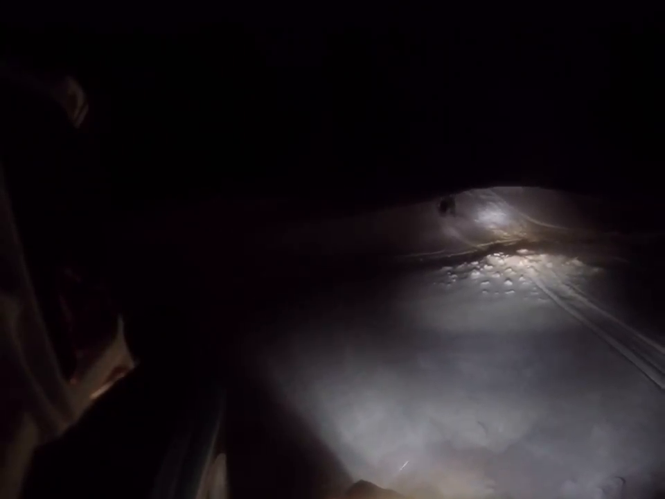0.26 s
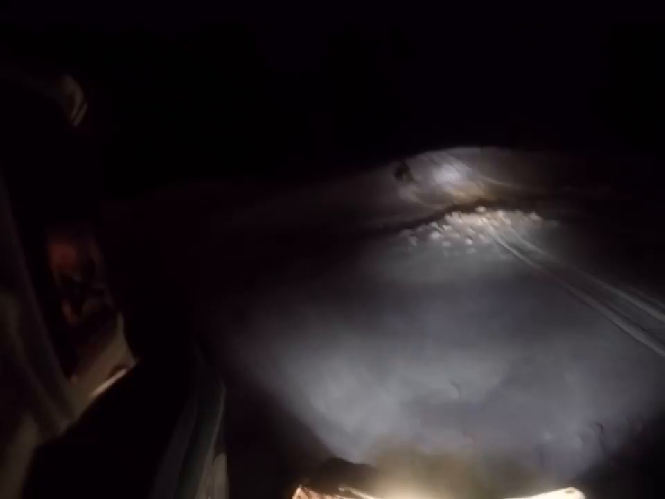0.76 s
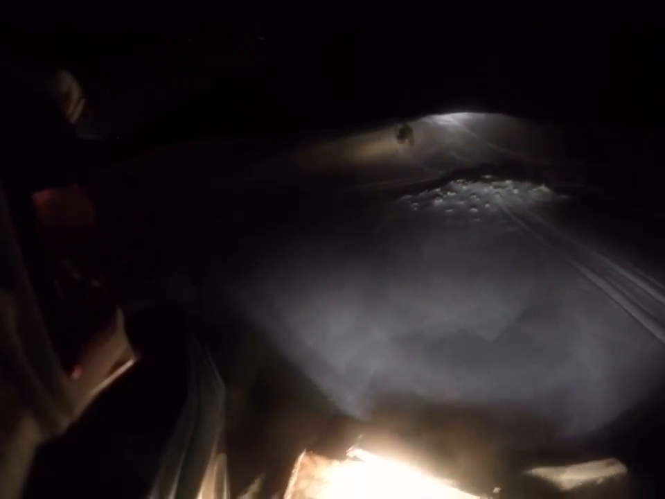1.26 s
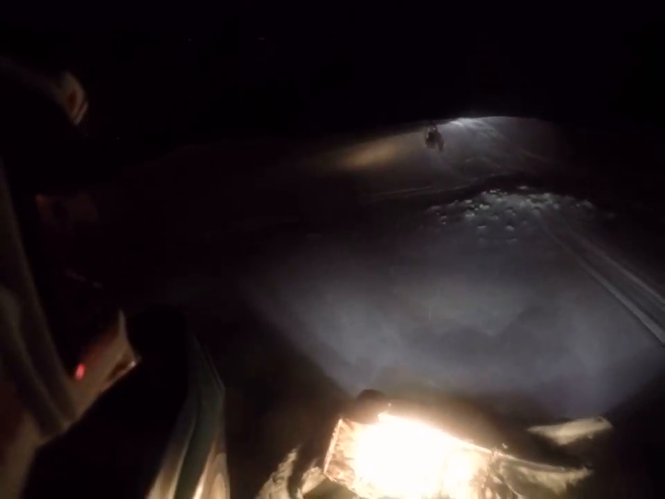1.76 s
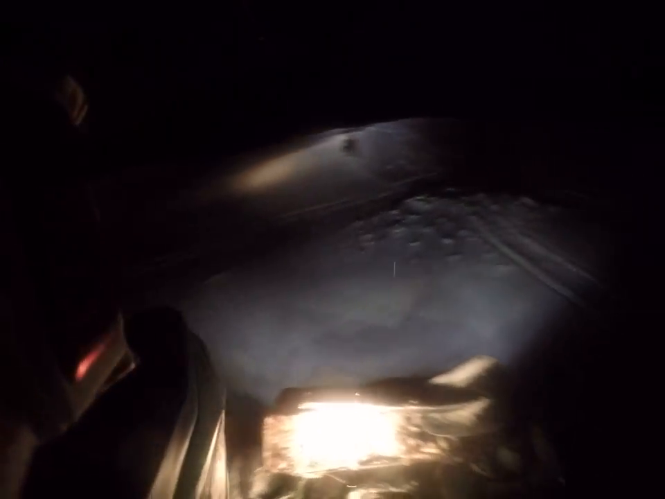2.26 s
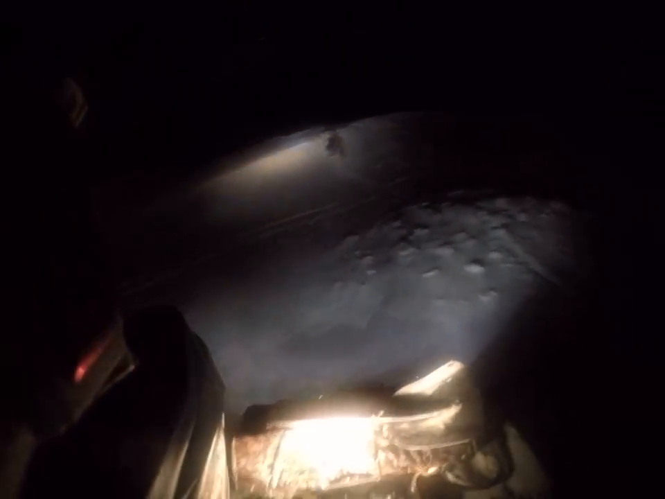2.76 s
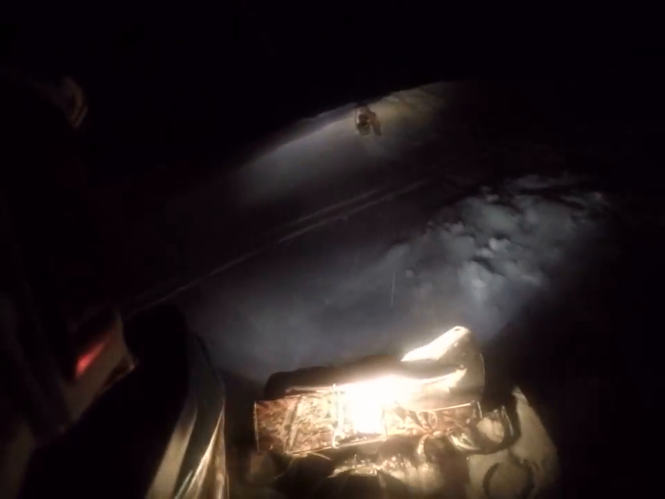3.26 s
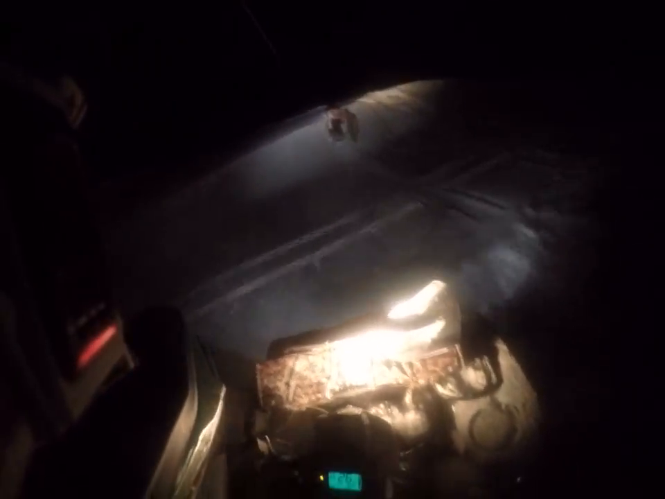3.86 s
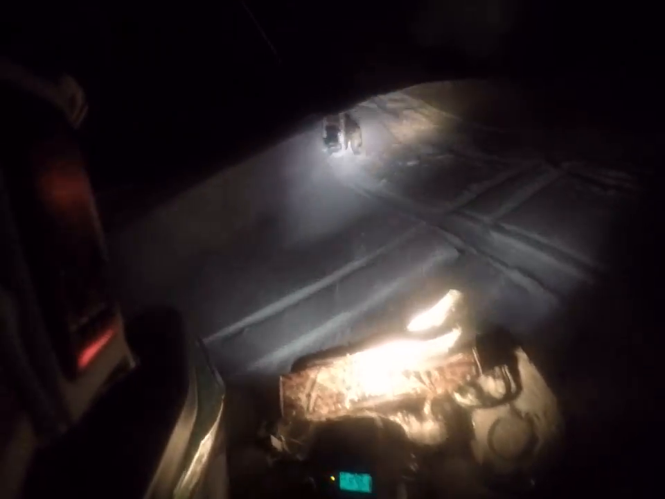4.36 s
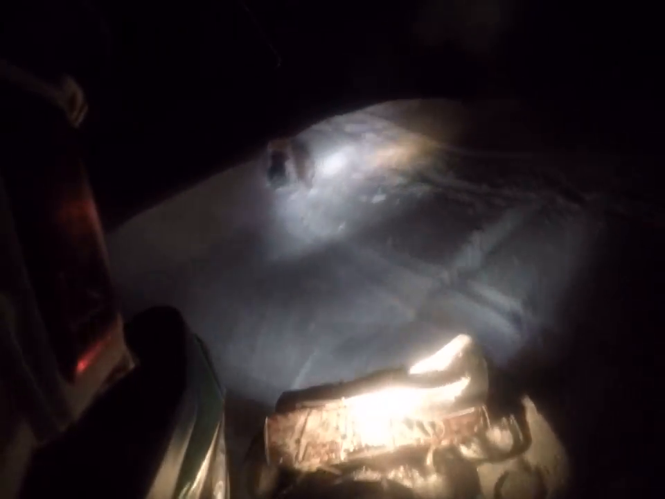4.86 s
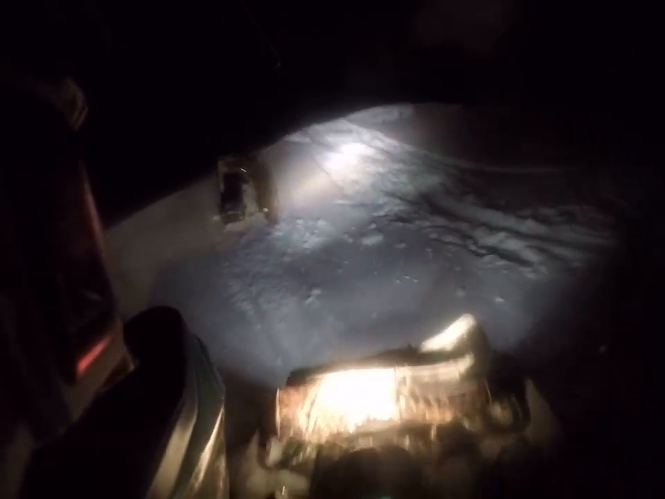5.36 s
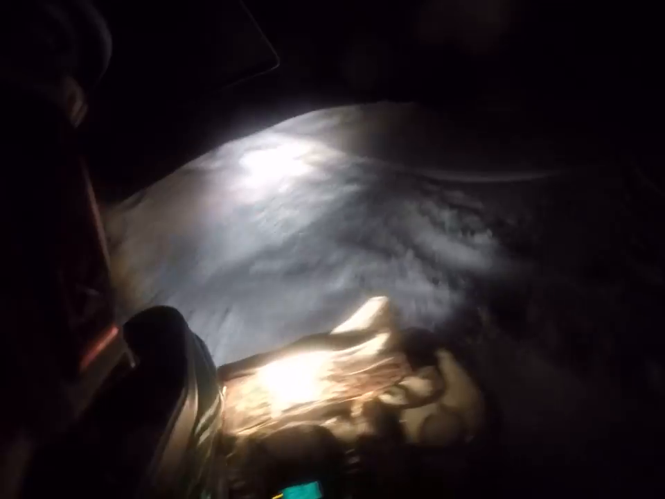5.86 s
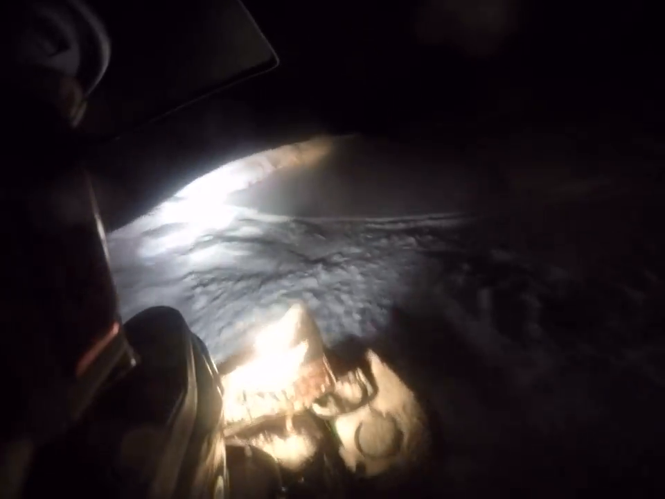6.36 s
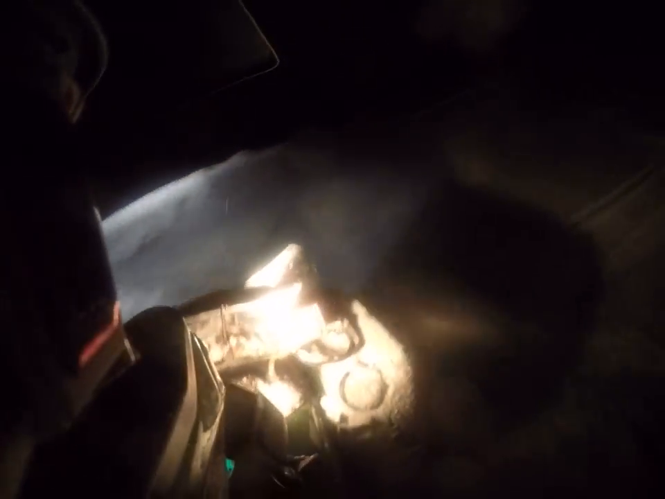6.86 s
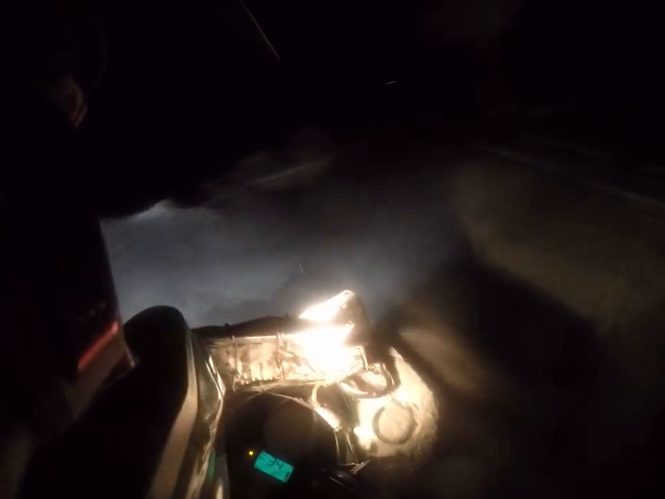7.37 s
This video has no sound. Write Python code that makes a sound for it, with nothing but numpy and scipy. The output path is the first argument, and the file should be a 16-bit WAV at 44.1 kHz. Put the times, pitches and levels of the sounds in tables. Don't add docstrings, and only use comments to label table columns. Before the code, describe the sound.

Heard from a hard case on the rider: low putting idle, a quick rev, a dip, and a second rise that holds with small easings. The exhaust turns fuller and rougher, with metallic clatter and hissing snow. Cloth rubs, ice grains tick, loose gear taps, and sharp knocks strike the case, the hardest with a deep thump. Faint belt chirps come late.

```python
import sys
import numpy as np
from scipy import signal
from scipy.fft import rfft, irfft
from scipy.io import wavfile
from scipy.ndimage import uniform_filter1d

SR = 44100
rng = np.random.default_rng(int(sys.argv[2]) if len(sys.argv) > 2 else 0)


def waveform_to_disk(signal):
    frames = np.transpose(np.atleast_2d(signal))
    scaled = np.clip(frames, -1, 1) * 32767
    samples = np.round(scaled).astype(np.int16)
    wavfile.write(sys.argv[1], SR, samples)


def voltage_ratio(level):
    return 10 ** (np.asarray(level, float) / 20)


N = 336042
T = np.arange(N) / SR

# time in seconds, rate in Hz.
SPEED = [(.5, 14.6), (1.08, 30.3), (1.27, 29.8), (1.45, 21), (1.92, 30.5), (2.87, 32), (3.38, 45.7),
         (3.65, 42.5), (4.08, 45.5), (4.24, 42.7), (4.6, 41.2), (5.1, 51.2), (5.5, 47.8), (6.15, 45.1),
         (6.42, 45.8), (6.8, 43.7), (7.25, 47.7), (7.62, 46.4)]
FLYWHEEL_S, IDLE_HZ, CLUTCH_HZ = 0.13, 14, 33
# time in seconds, exhaust level in dB, track load in dB, snow depth in dB.
EFFORT = [(.36, -47, -0.5, -1), (.78, -40.5, -1.5, -4.5), (.95, -33.5, -0.5, 0), (1.2, -36, -0.5, -3),
          (1.45, -38.5, 3, -2.5), (1.8, -33, 2, 1.5), (2.35, -38, -1.5, 0.5), (2.68, -36.5, -5, -4),
          (3.25, -29, -1, -1), (3.5, -33.5, -1, -2), (4.05, -29.5, 2, 1.5), (4.22, -32, 3, 1),
          (4.52, -32.5, 0.5, 0), (4.68, -29, 3, -2), (5.1, -26.5, -1, -3), (5.9, -32, -1.5, 1),
          (6.25, -29, 2, 2), (7.62, -30, 0, 0.5)]
# time in seconds, lag in ms, share 0 to 1.
INTAKE = [(0, 8, .3), (1.0, 8.3, .65), (1.9, 10.7, .7), (2.6, 10.6, .6), (2.74, 10.5, 0), (2.76, 4.6, 0),
          (3.0, 4.5, .5), (4.3, 4, .7), (7.62, 4, .7)]
# centre in Hz, width in Hz, level in dB.
PIPE_MODES = [(64, 31, -5), (95, 64.4, 2.5), (144.6, 68.3, -0.5), (186.6, 52, -3), (307.7, 47.3, -3.5),
              (337, 97, -10)]
# centre in Hz, width in Hz, level in dB.
TAILPIPE_MODES = [(436, 32, 2), (560, 130, -2.5), (643, 152, -5), (780.4, 35, 0)]
# centre in Hz, width in Hz, level in dB.
SILENCER_MODES = [(987, 39, 1), (1205, 93, -5.5)]
# frequency in Hz, density in dB per Hz.
ROAR_SPECTRUM = [(29, -25), (50, -39), (96, -20.5), (261, -3.5), (435, -8.5), (667, -7), (768, -1),
                 (886, -4.5), (1500, -15), (1950, -61), (3300, -120)]
# firing rate in Hz, level in dB.
POP_LAW = [(21, -64), (28, -57.5), (36, -47), (50, -44.5)]
# firing rate in Hz, level in dB.
SILENCER_LAW = [(15, -80), (28, -49), (33, -48.5), (41, -46), (50, -44)]
# time in seconds, half length in seconds, level in dB.
SHADED = [(1.1, 0.13, -14), (2.8, .2, -8), (4.61, .12, -4), (6.25, 0.33, -3.5)]
# time in seconds, half length in seconds, level in dB.
LIFTS = [(3.52, .1, -9), (4.36, .23, -12)]
EXHAUST_IDLE_DB, EXHAUST_DB_PER_HZ = -41.5, 0.25
BITE_DB_PER_DB, POP_BITE_DB_PER_DB, BITE_HZ, BITE_WIDTH_HZ = 2.5, 0.8, 154, 110
GROUND_LAG_MS, GROUND_DRIFT_MS, GROUND_SHARE = 2.4, 0.5, 0.6
# centre in Hz, width in Hz, level in dB.
CASE_MODES = [(1470, 158, -3.5), (1728, 143, 1.5), (1900, 146, 4.5), (2160, 281, -1.5), (2850, 97, -20),
              (5280, 220, -18.5), (7740, 210, -28.5)]
CLATTER_IDLE_DB, CLATTER_DB_PER_HZ = -49, 0.5

GEAR_TEETH = 40
# centre in Hz, width in Hz, level in dB.
GEARBOX_MODES = [(1424, 60, -47), (1667, 130, -40), (1828, 63, -38.5), (1898, 34, -34.5)]
# time in seconds, half length in seconds, level in dB.
GEAR_SLACK = (3.84, 0.36, -10)
# time in seconds, pitch in Hz, level in dB.
TRACK_HUM = [(4.55, 1470, -77), (4.75, 1462, -43), (5.3, 1371, -47), (5.8, 1448, -43.5), (6.15, 1386, -48),
             (6.5, 1304, -46), (6.7, 1240, -54), (7.15, 1286, -54), (7.62, 1310, -77)]
# time in seconds, half length in seconds, pitch in Hz, level in dB.
BELT_CHIRPS = [(5.37, 0.12, 5600, -48.5), (5.75, .22, 5610, -51), (6.433, 0.11, 5370, -53),
               (6.847, 0.14, 4600, -50.5), (7.3, .2, 5200, -53)]
# centre in Hz, width in Hz, level in dB.
PANEL_MODES = [(1200, 150, -6.5), (2785, 36, 2), (3960, 110, -9), (5410, 46, -9), (5980, 160, -15),
               (7600, 280, -22), (9700, 390, -26)]
BUZZ_DB, BUZZ_DROPS_S, BUZZ_FADE_DB = -53.5, 0.41, -7
BUZZ_SWELL_S, BUZZ_SWELL_HALF_S, BUZZ_SWELL_DB = 0.89, 0.19, -72

# time in seconds, swing level in dB.
BUMPS = [(.08, -34), (.79, -37), (.89, -37), (1.0, -29), (1.22, -31), (1.43, -30), (1.66, -30.5),
         (1.9, -37), (2.14, -39), (2.27, -45), (2.6, -31), (3.009, -16.5), (3.4, -30.5), (3.54, -30.5),
         (3.98, -31.5), (4.23, -24), (4.4, -30), (4.71, -26.5), (5.15, -30), (5.4, -33), (5.7, -43),
         (5.91, -39), (6.08, -36), (6.19, -35), (6.45, -28), (6.65, -31), (6.86, -31), (7.08, -31),
         (7.27, -33.5), (7.55, -34)]
BUMP_RISE_S, BUMP_FALL_S, SWAY_DB, LOCKED_DB = 0.052, 0.084, -41, -32.5
# frequency in Hz, density in dB per Hz.
SNOW_SPECTRUM = [(1350, -49), (2300, -7.5), (2430, -1.5), (2920, 3), (4050, -10), (4610, -7), (4990, -16),
                 (5450, -15.5), (6240, -11), (7030, -28.5), (7860, -15), (9010, -25.5), (12400, -29.5),
                 (14400, -35), (15500, -37)]
SNOW_IDLE_DB, SNOW_DB_PER_HZ = -57.5, 0.5381

# time in seconds, peak in dB, centre in Hz, case ring in dB, bright crack in dB.
KNOCKS = [(1.8886, -4, 5030, -42, -11), (3.4274, -18.5, 4500, -31, -25), (4.16, -21, 3500, -33, -20),
          (5.4392, -24, 3330, -40, -30), (2.4453, -8, 1900, -23, -34), (2.4476, 3, 2650, -7, -10),
          (2.4542, -7.5, 4400, -15.5, -31)]
# frequency in Hz, level in dB, t60 in seconds.
KNOCK_MODES = [(842, -5, 0.042), (1494, -4.5, 0.042), (1743, -12.5, 0.11), (2100, -13, 0.061),
               (2895, -0.5, 0.016), (3045, -21, 0.073), (3830, -14, 0.015), (4420, -32, 0.011),
               (5740, 2, 0.0052)]
# time in seconds, frequency in Hz, level in dB, t60 in seconds.
THUMP = (2.4462, 39, -10, .55)
RING_CYCLES = 27.8
# time in seconds, peak in dB, ring in Hz.
RATTLES = [(0.657, -45, 1920), (0.88, -37, 1860), (0.9171, -30, 1870), (2.482, -32, 1680),
           (2.492, -37, 1600), (4.2941, -26, 1670), (5.648, -24, 1830), (6.9035, -20, 1810)]
# time in seconds, peak in dB, mid band relative in dB.
TICKS = [(1.4383, -35, -10), (1.747, -39, 6), (1.9704, -36, 5), (2.3022, -34, 3), (3.0054, -36, 2),
         (3.0098, -29.5, 2), (3.083, -34, -12), (3.3795, -31, -10), (3.4272, -37, 7), (3.459, -35, -8),
         (3.5084, -41, 9), (3.8876, -39, -4), (3.9749, -38, -3), (4.0582, -31, -6), (4.16, -23.5, -1),
         (4.5894, -38, -17), (4.8249, -38, -1), (4.8618, -35, 8), (5.0486, -37.5, 18), (5.1352, -39, -4),
         (5.3423, -37, 1), (5.697, -29.5, 8), (5.903, -37, -4), (6.2492, -32, -10), (6.324, -38, -4),
         (6.9743, -33, -1), (6.9892, -30, 11), (7.0394, -32, -9), (7.1777, -32, -3), (7.2903, -39, -4)]
# time in seconds, half length in seconds, level in dB, bright band relative in dB.
RUBS = [(.94, 0.036, -50, -26), (1.423, 0.058, -44, -19), (1.503, 0.038, -37.5, -25),
        (1.612, 0.053, -40.5, -23), (2.2, 0.14, -45.5, -21), (4.06, 0.15, -41.5, -18),
        (4.322, 0.059, -47.5, -12), (4.889, 0.033, -39, -15), (4.974, 0.056, -39, -18)]
HISS_DB = -68.5


def level(x, db=0):
    return x * voltage_ratio(db) / np.sqrt(np.mean(x ** 2))


def ring(x, hz, width_hz):
    return signal.lfilter(*signal.iirpeak(hz, hz / width_hz, fs=SR), x)


def ring_twice(x, first, second):
    return ring(ring(x, *first), *second)


def body(x, modes):
    return sum((-1) ** k * voltage_ratio(db) * ring(x, hz, width_hz) for k, (hz, width_hz, db) in enumerate(modes))


def steep(x, hz, kind):
    return signal.sosfilt(signal.butter(4, hz, kind, fs=SR, output="sos"), x)


def coloured(spectrum):
    hz, db = np.transpose(spectrum)
    f = np.maximum(np.fft.rfftfreq(N, 1 / SR), 1)
    shape = voltage_ratio(np.interp(np.log(f), np.log(hz), db, -90, -90))
    return level(irfft(rfft(rng.standard_normal(N)) * shape, N))


def walk(rate_hz):
    hold = int(SR / rate_hz)
    steps = rng.standard_normal(N)[np.arange(N) // hold]
    return level(uniform_filter1d(uniform_filter1d(steps, hold), hold))


def swell(s, half_s):
    return np.exp(-((T - s) / half_s) ** 2)


def curves(table):
    s, *columns = np.transpose(table)
    return [np.interp(T, s, c) for c in columns]


def add(out, s, sound):
    i = int(s * SR)
    out[i:i + len(sound)] += sound[:len(out) - i]


def decay(t, t60_s):
    return voltage_ratio(-60 * t / t60_s)


def sine(hz, t):
    return np.sin(2 * np.pi * hz * t)


def revs():
    return uniform_filter1d(curves(SPEED)[0], int(FLYWHEEL_S * SR))


def engine():
    hz = revs()
    turns = np.cumsum(hz) / SR
    pipe_db = curves(EFFORT)[0]
    push_db = pipe_db - EXHAUST_IDLE_DB - EXHAUST_DB_PER_HZ * (hz - IDLE_HZ)
    direct, with_return = firings(turns, jitter=0.002, scatter_db=1.2) / np.sqrt(hz)
    spread = scatter(direct, [2.3, 4.1], gain=0.55)
    return (voltage_ratio(pipe_db) * exhaust(with_return, hz, turns, push_db)
            + ground(pops(spread, hz, push_db)) + clatter(spread, hz, turns))


def firings(turns, jitter, scatter_db):
    cycle = np.arange(1, int(turns[-1]))
    late, strength = rng.standard_normal((400, 2))[:len(cycle)].T
    at = np.interp(cycle + jitter * late, turns, np.arange(N))
    i = at.astype(int)
    size = voltage_ratio(scatter_db * strength)
    pulses = np.zeros(N + 1)
    pulses[i] += size * (1 - (at - i))
    pulses[i + 1] += size * (at - i)
    lag_ms, share = curves(INTAKE)
    back = np.zeros(N + SR)
    back[i + (lag_ms[i] * SR / 1000).astype(int)] = size * np.clip(share[i], 0, 1)
    return pulses[:N], pulses[:N] - back[:N]


def scatter(x, lags_ms, gain):
    for lag in (np.array(lags_ms) * SR / 1000).astype(int):
        taps = np.r_[1, np.zeros(lag - 1), -gain]
        x = signal.lfilter(taps[::-1], taps, x)
    return x


def exhaust(pulses, hz, turns, push_db):
    slack = np.clip((24 - hz) / 8, 0, 1)
    pipe = level(steep(body(scatter(pulses, [3.2], gain=0.33), PIPE_MODES), 356, "low"), -1.98)
    pipe = pipe * voltage_ratio(-5 * slack)
    lift_db = sum(db * swell(s, half_s) for s, half_s, db in LIFTS)
    bite_db = np.clip(BITE_DB_PER_DB * push_db, -10, 0.3) + lift_db - 5 * slack
    bite = (voltage_ratio(bite_db) - 1) * ring(pipe, BITE_HZ, BITE_WIDTH_HZ)
    gas = voltage_ratio(2.2 * walk(25)) * coloured(ROAR_SPECTRUM)
    roar = level(gas, -17) + slack * level(steep(gas, 150, "low"), -5)
    crank = voltage_ratio(2) * np.exp(-((hz - 31) / 9) ** 2) * sine(2, turns) + voltage_ratio(-7) * sine(1, turns)
    return pipe + bite + roar + crank


def pops(spread, hz, push_db):
    throttle_db = POP_BITE_DB_PER_DB * np.clip(push_db, -2, 4) * (hz < CLUTCH_HZ)
    tailpipe_db = np.interp(hz, *np.transpose(POP_LAW)) + throttle_db
    shade_db = sum(db * swell(s, half_s) for s, half_s, db in SHADED)
    silencer_db = np.interp(hz, *np.transpose(SILENCER_LAW)) + shade_db
    tailpipe = level(steep(body(spread, TAILPIPE_MODES), 390, "high"), 0)
    silencer = level(steep(body(spread, SILENCER_MODES), 850, "high"), -1)
    return voltage_ratio(tailpipe_db) * tailpipe + voltage_ratio(silencer_db) * silencer


def ground(x):
    lag_s = (GROUND_LAG_MS + GROUND_DRIFT_MS * walk(1.507)) / 1000
    return (x + GROUND_SHARE * np.interp(T - lag_s, T, x)) / np.hypot(1, GROUND_SHARE)


def clatter(spread, hz, turns):
    valves = 3.0 + 0.23 * np.exp(-(turns % 1) / 0.15) + 0.5 * np.exp(-((turns + 0.26) % 1) / 0.44)
    strikes = valves * voltage_ratio(0.51 * walk(120) + 0.5 * walk(16)) * rng.standard_normal(N)
    strikes = strikes + 12 * spread * np.sqrt(SR / 40)
    db = CLATTER_IDLE_DB + CLATTER_DB_PER_HZ * (hz - IDLE_HZ) + curves(EFFORT)[1]
    return voltage_ratio(db) * level(steep(body(strikes, CASE_MODES), 1180, "high"), -1.72)


def drive():
    return gear_whine() + squeal(*curves(TRACK_HUM), blur_hz=45) + belt() + panel_buzz()


def gear_whine():
    hz = revs()
    slack_s, slack_half_s, slack_db = GEAR_SLACK
    engaged = np.clip((hz - CLUTCH_HZ) / 2, 0, 1) * voltage_ratio(slack_db * swell(slack_s, slack_half_s))
    teeth = tone(GEAR_TEETH * hz, 0.5 * curves(EFFORT)[1], wobble_hz=6, flicker_db=3)
    return engaged * body(teeth, GEARBOX_MODES)


def tone(hz, db, wobble_hz, flicker_db):
    phase = 2 * np.pi * np.cumsum(hz + wobble_hz * walk(60)) / SR
    return np.sqrt(2) * voltage_ratio(db + flicker_db * walk(18)) * np.sin(phase)


def squeal(hz, db, blur_hz):
    phase = 2 * np.pi * np.cumsum(hz) / SR
    return voltage_ratio(db) * (walk(blur_hz) * np.sin(phase) + walk(blur_hz) * np.cos(phase))


def belt():
    slip = sum(voltage_ratio(db) * swell(s, half_s) for s, half_s, _, db in BELT_CHIRPS)
    s, _, hz, _ = np.transpose(BELT_CHIRPS)
    return slip * squeal(np.interp(T, s, hz), 0, blur_hz=450)


def panel_buzz():
    buzz = level(body(voltage_ratio(2.0 * walk(70)) * rng.standard_normal(N), PANEL_MODES))
    fade_db = BUZZ_FADE_DB * np.clip((T - BUZZ_DROPS_S) / 0.11 + 0.5, 0, 1)
    idle = voltage_ratio(BUZZ_DB + fade_db) * (T < BUZZ_SWELL_S + 2 * BUZZ_SWELL_HALF_S)
    extra = voltage_ratio(BUZZ_SWELL_DB) * swell(BUZZ_SWELL_S, BUZZ_SWELL_HALF_S)
    return (idle + extra) * buzz


def mount():
    hz = revs()
    locked = np.exp(-((hz - 31.5) / 5) ** 2)
    sway_hz = locked * hz + (1 - locked) * (36 + 5.524 * walk(9))
    sway = np.sqrt(2) * np.sin(2 * np.pi * np.cumsum(sway_hz) / SR)
    jolts = level(ring_twice(rng.standard_normal(N), (30, 45), (38, 60)), -4)
    swing = voltage_ratio(SWAY_DB) + voltage_ratio(LOCKED_DB) * locked
    for s, db in BUMPS:
        swing = swing + voltage_ratio(db) * swell(s, np.where(T < s, BUMP_RISE_S, BUMP_FALL_S))
    held = 1 - swell(THUMP[0] + 0.06, 0.08)
    return steep(voltage_ratio(-1.5) * swing * held * (sway + jolts), 62, "low")


def snow():
    grains = voltage_ratio(0.87 * walk(150) + 0.83 * walk(20)) * coloured(SNOW_SPECTRUM)
    db = SNOW_IDLE_DB + SNOW_DB_PER_HZ * (revs() - IDLE_HZ) + curves(EFFORT)[2]
    return voltage_ratio(db) * level(grains, -0.9)


def knocks():
    out, t = np.zeros(N), T[:SR // 2]
    modes = sum(voltage_ratio(db) * sine(hz, t) * decay(t, t60_s) for hz, db, t60_s in KNOCK_MODES)
    noises = rng.standard_normal((len(KNOCKS), len(t)))
    for (s, db, hz, case_db, crack_db), noise in zip(KNOCKS, noises):
        own = 1.14 * sine(hz, t) + ring_twice(noise, (hz, hz), (hz, 1.2 * hz))
        own = own * decay(t, RING_CYCLES / hz)
        crack = voltage_ratio(crack_db) * ring_twice(noise, (10000, 9000), (9500, 11000)) * decay(t, 0.006)
        grit = voltage_ratio(-31) * ring_twice(noise, (2700, 4200), (3200, 4200)) * decay(t, 0.14)
        add(out, s, voltage_ratio(db) * (own + crack + grit) + voltage_ratio(case_db) * modes)
    s, hz, db, t60_s = THUMP
    add(out, s, voltage_ratio(-8) * sine(330, t) * decay(t, 0.023))
    add(out, s + 0.0007, voltage_ratio(-9) * sine(150, t) * decay(t, 0.05))
    add(out, s + 0.004, -voltage_ratio(-15.5) * sine(100, t) * decay(t, 0.064))
    add(out, s, -voltage_ratio(db) * sine(hz, t) * decay(t, t60_s))
    return out


def rattles():
    out, t = np.zeros(N), T[:1500]
    for (s, db, hz), noise in zip(RATTLES, rng.standard_normal((len(RATTLES), 1500))):
        scrape = ring_twice(noise * np.exp(-t / 0.003), (2400, 2500), (2000, 2500))
        tap = sine(hz, t) * np.exp(-t / 0.005) + 1.5 * scrape
        add(out, s, voltage_ratio(db + 4) * tap / np.abs(tap).max())
    return out


def ticks():
    out, t = np.zeros(N), T[:400]
    for (s, db, mid_db), noise in zip(TICKS, rng.standard_normal((len(TICKS), 400))):
        crack = noise * np.exp(-t / 0.0008)
        high = ring_twice(crack, (9800, 12000), (9800, 12000))
        mid = ring_twice(crack, (5600, 4500), (5600, 4500))
        add(out, s, voltage_ratio(db) * (high / np.abs(high).max() + voltage_ratio(mid_db - 4) * mid / np.abs(mid).max()))
    return out


def rubs():
    slips = voltage_ratio(1.7 * walk(250)) * rng.standard_normal(N)
    mid = level(ring_twice(slips, (3050, 780), (2100, 1060)))
    bright = level(ring_twice(slips, (9200, 1500), (7600, 2200)))
    return sum(voltage_ratio(db) * swell(s, half_s) * (mid + voltage_ratio(bright_db) * bright) for s, half_s, db, bright_db in RUBS)


def scene():
    return (engine() + drive() + mount() + snow() + knocks() + rattles() + ticks() + rubs())[None]


def band_limit(x):
    return signal.sosfilt(signal.butter(12, 16480, fs=SR, output="sos"), x)


def record(dry):
    duck_db = -4 * np.exp(-np.maximum(T - THUMP[0], 0) / 0.19) * (T > THUMP[0])
    hiss = voltage_ratio(HISS_DB + duck_db) * rng.standard_normal(N)
    top = signal.ellip(6, 0.5, 45, 15400, fs=SR, output="sos")
    mix = signal.sosfilt(top, np.clip(dry + hiss, -1, 1))
    return band_limit(mix)


dry = scene()
out = record(dry)
waveform_to_disk(out)
```